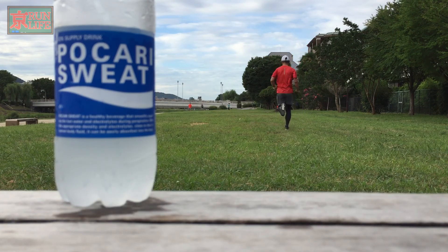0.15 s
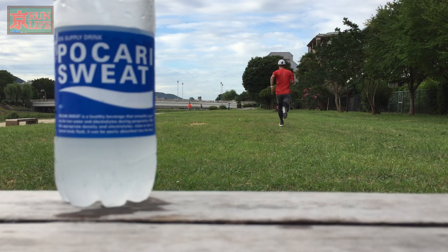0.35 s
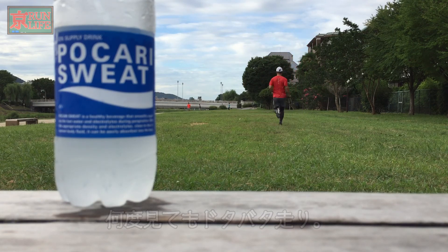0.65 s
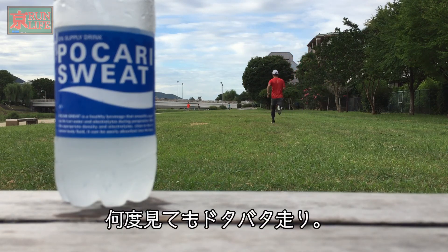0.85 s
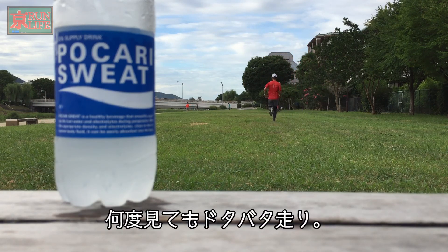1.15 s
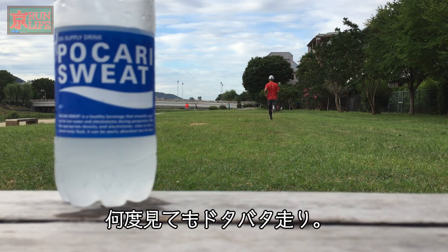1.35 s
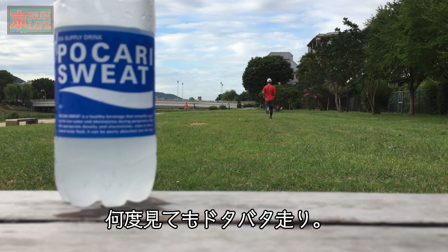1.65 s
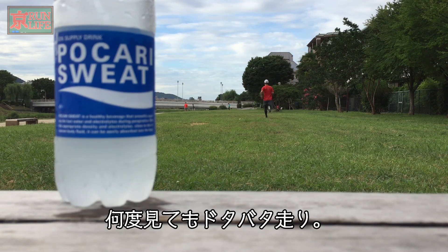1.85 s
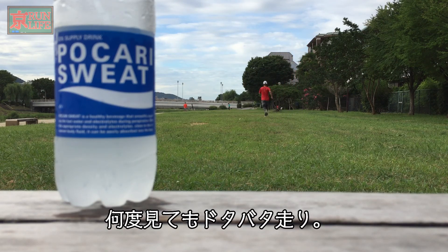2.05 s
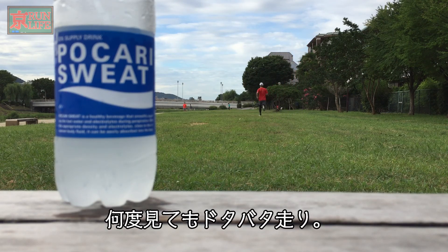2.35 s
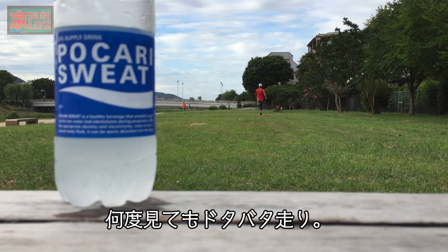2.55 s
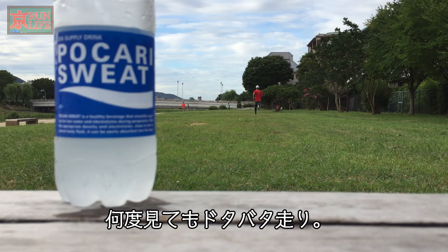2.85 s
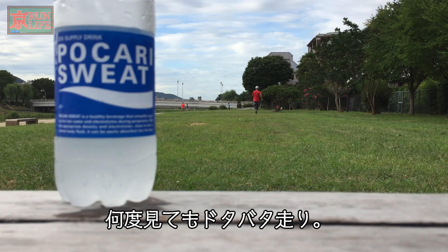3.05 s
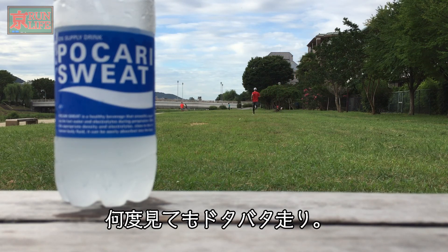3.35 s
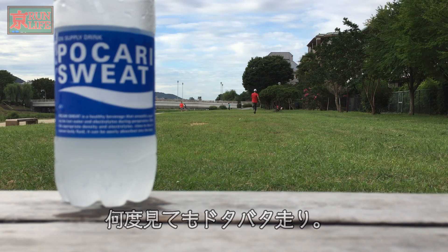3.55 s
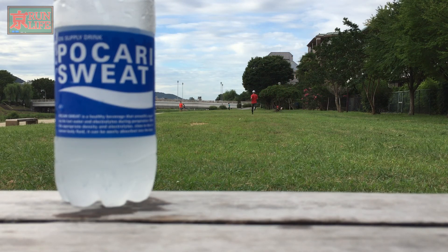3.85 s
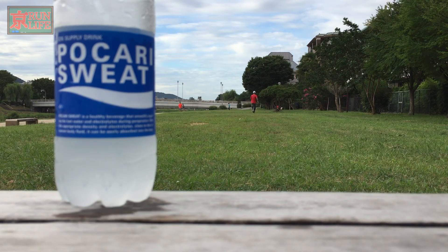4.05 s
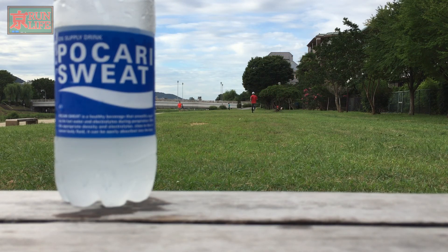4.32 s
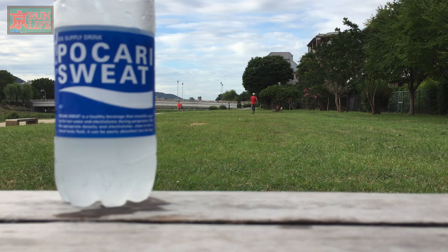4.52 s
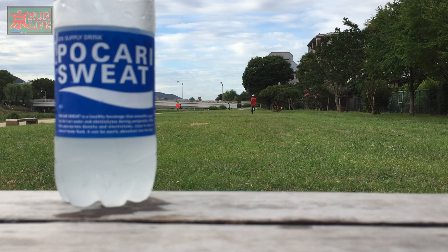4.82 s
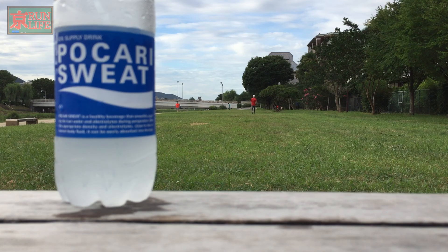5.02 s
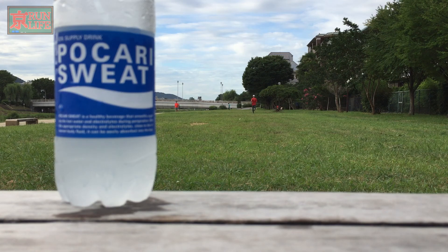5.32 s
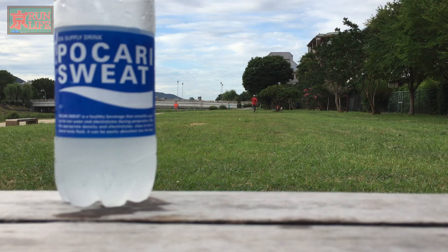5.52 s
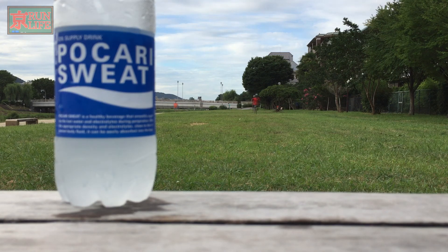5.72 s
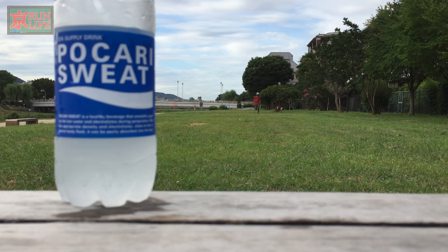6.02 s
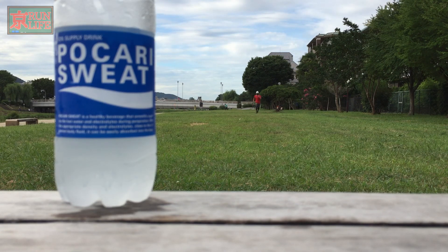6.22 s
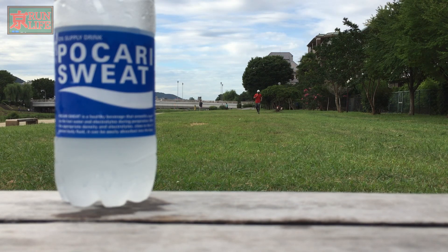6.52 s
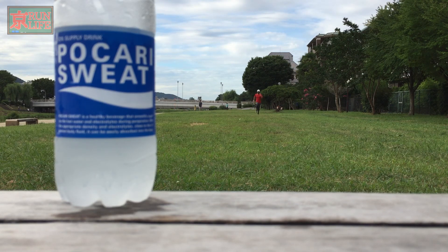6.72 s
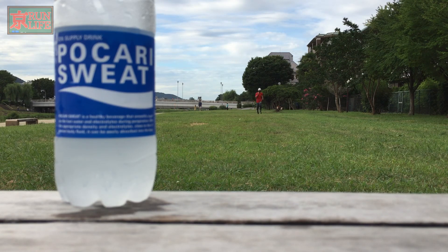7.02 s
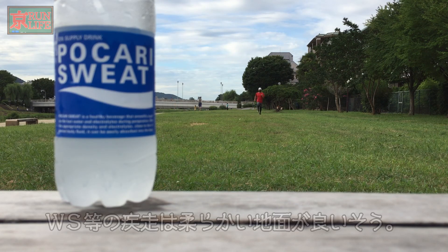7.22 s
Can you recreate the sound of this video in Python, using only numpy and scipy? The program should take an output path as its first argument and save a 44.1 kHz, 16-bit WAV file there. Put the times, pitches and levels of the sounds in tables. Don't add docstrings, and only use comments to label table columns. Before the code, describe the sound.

Many cicadas shrill without pause in park trees. Several nearer singers pulse about five times a second, drifting in and out of step, over a wide, steady far chorus. Very faint low traffic rumble lies beneath, with a distant engine hum fading early. The level dips briefly past the middle, then recovers. Mono camera microphone on a bench, open air, no obvious echo.

```python
import sys
import numpy as np
from scipy import signal
from scipy.fft import rfft, irfft
from scipy.io import wavfile

SR = 44100
rng = np.random.default_rng(int(sys.argv[2]) if len(sys.argv) > 2 else 0)


def store_wav(level_fs):
    pcm = np.round(np.clip(np.atleast_2d(level_fs), -1, 1) * 32767)
    wavfile.write(sys.argv[1], SR, pcm.T.astype(np.int16))


def boost_factor(decibels):
    exponent = np.asarray(decibels, float) / 20
    return 10 ** exponent


N = 325458
TIME = np.arange(N) / SR
HZ = np.fft.rfftfreq(N, 1 / SR)
BEAT_S = .195


def evened(x):
    return x / np.sqrt(np.mean(x ** 2) + 1e-20)


def curve(rows, axis):
    rows = np.array(rows)
    return np.interp(TIME, rows[:, 0], rows[:, axis])


def colour(points, top_hz=SR / 2):
    hz, db = np.transpose(points)
    return boost_factor(np.interp(np.log(HZ.clip(max=top_hz) + 1), np.log(hz), db, left=-90, right=-90))


def filtered(x, shape):
    return evened(irfft(rfft(x) * shape, N))


def drift(rate_hz):
    slow = TIME[::32]
    hz = np.fft.rfftfreq(len(slow), slow[1])
    lowpass = np.exp(-(hz / rate_hz) ** 2) * (hz > 0)
    shaped = rfft(rng.standard_normal(len(slow))) * lowpass
    return np.interp(TIME, slow, evened(irfft(shaped, len(slow))))


def tymbals(click_hz, weak_db, click_s, jitter, blur):
    pace = 1 + .015 * drift(3.) + jitter * drift(150.)
    count = np.floor(np.cumsum(2 * click_hz * pace) / SR)
    click_db = weak_db * (count % 2) + 1.5 * rng.standard_normal(N)
    clicks = np.diff(count, prepend=0).clip(0) * boost_factor(click_db)
    power = signal.lfilter([1], [1, -np.exp(-1 / (SR * click_s))], clicks ** 2)
    return rng.standard_normal(N) * np.sqrt(blur + (1 - blur) * power / power.mean())


def singer(phrases, body, drive, stretch, trim_db, tail_s):
    ring = sum(boost_factor(db) / (1 + (2 * (HZ - hz) / width) ** 2) ** 1.5 for hz, width, db in body)
    slow = TIME[::40]
    power = np.zeros(len(slow))
    for first, last, first_db, last_db, length in phrases:
        syllables = round((last - first) / BEAT_S) + 1
        for centre, db in np.linspace((first, first_db), (last, last_db), syllables):
            swell = np.exp(-abs(2 * (slow - centre) / (stretch * length)) ** 4)
            power += boost_factor(2 * db) * swell
    keep = np.exp(-1 / (SR * tail_s))
    power = signal.lfilter([1 - keep], [1, -keep], np.interp(TIME, slow, power))
    return boost_factor(trim_db) * np.sqrt(power) * filtered(drive, ring)



MID_PHRASES = [
    (.131, .53, -29, -28.6, .063),
    (.703, 1.084, -30.5, -32.2, .08),
    (1.258, 1.258, -27, -27, .042),
    (1.446, 2.174, -31, -31.2, .08),
    (2.378, 3.155, -29.5, -32.5, .09),
    (3.514, 4.106, -31, -33.8, .115),
    (4.629, 5.006, -33, -36, .12),
    (5.238, 5.635, -30.3, -35.8, .115),
    (6.013, 6.209, -29.5, -31, .06),
    (6.405, 6.807, -32.5, -34.5, .105),
]
MID_RESONANCES = [(4604, 280, 0.88), (5440, 2100, -2.9)]
MID_DRUMS = (167, -1.5, .0006, .03, .35)


def mid_singer():
    return singer(MID_PHRASES, MID_RESONANCES, tymbals(*MID_DRUMS), stretch=.89, trim_db=.16, tail_s=.0024)


SHRILL_PHRASES = [(.15, .364, -32, -29, .046), (.24, .436, -29.6, -28.8, .055),
                  (.598, .819, -31.5, -32, .125), (.974, 1.18, -30.5, -28.5, .045),
                  (1.044, 1.262, -31, -28, .065), (1.425, 2.406, -29.3, -32, .11),
                  (2.573, 3.338, -31, -30, .07), (2.655, 3.05, -30.5, -34.3, .06),
                  (3.512, 4.111, -30, -29.6, .125), (4.305, 4.895, -29.5, -31, .105),
                  (5.088, 5.467, -30, -28.8, .07), (5.658, 5.658, -39, -39, .11),
                  (5.843, 6.433, -32, -27, .048), (5.949, 6.332, -32, -28.3, .059),
                  (6.66, 7.033, -29.3, -28.8, .13), (7.164, 7.357, -30, -27, .04)]
SHRILL_RESONANCES = [(8500, 630, -3), (8970, 500, -1.5), (9790, 910, -6)]
SHRILL_DRUMS = (172, -2.5, .0006, .025, .4)


def shrill_singers():
    drive = tymbals(*SHRILL_DRUMS)
    return singer(SHRILL_PHRASES, SHRILL_RESONANCES, drive, stretch=1.0, trim_db=-.43, tail_s=.0013)


REED_PHRASES = [
    (.145, .974, -31.2, -33, .092),
    (1.19, 1.979, -33.5, -32.3, .1),
    (2.175, 2.374, -34, -30, .085),
    (2.57, 2.965, -31, -31.7, .107),
    (3.156, 4.128, -29.8, -31, .085),
    (4.317, 4.705, -32, -31.5, .115),
    (4.906, 5.283, -29.4, -29.7, .078),
    (5.466, 5.466, -33.9, -33.9, .077),
    (6.196, 6.41, -39, -33.1, .09),
    (6.659, 7.257, -33.5, -35.8, .108),
]
REED_RESONANCES = [(6960, 880, 0), (7320, 700, -6), (8040, 830, 1), (8920, 600, -3), (11050, 1300, -13),
                   (6240, 600, -11)]
REED_DRUMS = (152, -3.5, .0005, .015, .15)


def reed_singer():
    drive = tymbals(*REED_DRUMS)
    return singer(REED_PHRASES, REED_RESONANCES, drive, stretch=.73, trim_db=1.1, tail_s=.002)


HIGH_PHRASES = [
    (.047, .847, -35, -35, .06),
    (1.052, 2.062, -35.5, -35.5, .065),
    (2.242, 2.425, -39.2, -39.9, .1),
    (2.655, 3.279, -40, -35, .048),
    (3.505, 4.278, -39.5, -39, .09),
    (4.493, 5.277, -35.8, -34, .07),
    (5.474, 5.673, -37, -39, .062),
    (5.955, 6.328, -36, -31.5, .059),
    (6.511, 6.88, -32.5, -34.8, .064),
    (7.063, 7.255, -32, -33, .059),
]
ANSWER_PHRASES = [
    (4.36, 4.36, -42, -42, .05),
    (4.793, 4.793, -39, -39, .05),
    (5.182, 5.77, -41.6, -39.5, .048),
    (5.87, 6.24, -44.5, -41, .045),
    (7.16, 7.16, -41, -41, .045),
]
HIGH_RESONANCES = [(9360, 970, 1), (10200, 700, -2.5), (10860, 670, -0.5), (11560, 600, -10),
                   (12500, 1300, -20)]
HIGH_DRUMS = (164, -3.5, .00035, .02, .3)


def high_singers():
    phrases = HIGH_PHRASES + ANSWER_PHRASES
    return singer(phrases, HIGH_RESONANCES, tymbals(*HIGH_DRUMS), stretch=.86, trim_db=2.9, tail_s=.0017)


BELLY_PHRASES = [(.055, .879, -37, -38.5, .085), (1.101, 1.101, -41.1, -41.1, .22),
                 (1.435, 1.435, -41, -41, .117), (1.702, 2.088, -40, -41, .09),
                 (2.495, 2.645, -39, -40, .08), (2.873, 3.253, -37.3, -35, .072),
                 (3.452, 4.245, -39.5, -37.5, .08), (4.443, 4.825, -45, -35.5, .062),
                 (5.012, 5.385, -39, -43, .062), (5.856, 5.856, -43, -43, .056),
                 (6.345, 6.94, -40, -44, .083), (7.155, 7.343, -40, -47, .06)]
BELLY_RESONANCE = [(2135, 107, 0)]


def belly_note():
    breath = rng.standard_normal(N)
    return singer(BELLY_PHRASES, BELLY_RESONANCE, breath, stretch=.75, trim_db=-1.2, tail_s=.0056)


# (time [s], effort [dB], lead of the shrill voices [dB])
CHORUS_EFFORT = [(0, -.2, 3), (.4, .3, -1.5), (.9, .3, 1), (1.6, .1, -.6), (2.3, -.4, 1.2), (2.8, .2, -1),
                 (3.9, -.5, 0), (4.3, .5, -.7), (4.6, 0, -1.3), (5.1, .1, -.3), (6.3, .2, .5),
                 (6.6, 0, 1.5), (6.9, .2, -.3), (7.38, .6, 2)]
# (frequency [Hz], level [dB per Hz])
CHORUS_SPECTRUM = [(760, -107), (1300, -32.5), (1720, -21.5), (2210, -6), (2350, -2.5), (3210, -1),
                   (3670, -3.5), (4560, -2), (6560, -6.5), (8960, -1), (9630, -2), (10600, -12),
                   (13400, -21.5), (14300, -26.5), (15500, -34)]
# (centre [Hz], level [dB], share of the sag [ratio], share of the lead [ratio])
CHORUS_RANGES = [(3000, -23.3, 1.0, -.1), (5400, -22.8, 1.1, -.2), (8500, -24.4, .6, 1.0),
                 (13000, -24.7, .8, -.1)]
# (centre [Hz], width [Hz], level [dB])
CHORUS_RESONANCES = [(2290, 99, 2), (3200, 310, 1.5), (4370, 280, 2), (5720, 470, 1.), (6570, 490, -3),
                     (10450, 700, -3), (1430, 190, 3.5)]


def chorus(throb_db=.5, patchy_db=.85):
    centres = np.geomspace(1700, 14000, num=12)
    step = np.log(centres[1] / centres[0])
    rings_db = sum(db / (1 + (2 * (HZ - hz) / width) ** 2) for hz, width, db in CHORUS_RESONANCES)
    whole = colour(CHORUS_SPECTRUM, top_hz=15000) * boost_factor(rings_db)
    range_hz, *laws = np.transpose(CHORUS_RANGES)
    effort_db, lead_db, sag_db = curve(CHORUS_EFFORT, axis=1), curve(CHORUS_EFFORT, axis=2), sag()
    out = np.zeros(N)
    for hz in centres:
        distance = np.log(HZ.clip(centres[0], centres[-1]) / hz) / step
        share = np.cos(np.pi / 2 * np.clip(distance, -1, 1))
        weight = np.sqrt(np.sum((whole * share) ** 2) / np.sum(whole ** 2))
        base_db, sag_share, lead_share = (np.interp(np.log(hz), np.log(range_hz), law) for law in laws)
        level_db = base_db + effort_db + lead_share * lead_db + sag_share * sag_db
        throb = np.sin(2 * np.pi * (rng.uniform(4.9, 5.4) * TIME + rng.random() + .23 * drift(.38)))
        level_db = level_db + throb_db * throb + patchy_db * drift(14.3)
        drive = tymbals(rng.uniform(150, 175), weak_db=0., click_s=.0016, jitter=.036, blur=.68)
        out += weight * boost_factor(level_db) * filtered(drive, whole * share)
    return out


# (frequency [Hz], level [dB per Hz])
TOWN_SPECTRUM = [(13, -60), (22, -30), (39, -44.5), (65, -0.5), (206, -5), (275, -11), (388, -12),
                 (462, -18.5), (1140, -23), (1710, -28), (1960, -31.5), (2200, -12), (2860, -42),
                 (4840, -120)]


def town_rumble():
    level_db = -41.2 + .25 * TIME + .6 * sag()
    return boost_factor(level_db) * filtered(rng.standard_normal(N), colour(TOWN_SPECTRUM))


# (centre time [s], level [dB])
TRAFFIC_SWELLS = [
    (.55, -37.5),
    (1.75, -37.5),
    (2.4, -35),
    (3.0, -40),
    (3.6, -36.5),
    (4.2, -38.5),
    (5.1, -42),
    (5.7, -36.5),
    (6.3, -40),
    (7.2, -37.5),
]


def traffic_thrum():
    width_s, floor_db = .25, -46
    swells = boost_factor(floor_db)
    swells = swells + sum(boost_factor(db - 3) * np.exp(-((TIME - s) / width_s) ** 2) for s, db in TRAFFIC_SWELLS)
    return boost_factor(-5.5) * swells * filtered(rng.standard_normal(N), np.exp(-((HZ - 64) / 18) ** 2))


# (time [s], pitch [Hz], level [dB])
ENGINE_NOTE = [
    (0, 87.6, -44),
    (.3, 87.15, -41.5),
    (.7, 88, -41),
    (1.0, 88.6, -41),
    (1.4, 90.4, -40.5),
    (1.8, 90, -38),
    (2.1, 91.4, -42.5),
    (2.6, 87, -52),
]


def engine_hum():
    pitch_hz = curve(ENGINE_NOTE, axis=1) + 1.46 * drift(3.25)
    fade = np.clip((2.6 - TIME) / .26, 0, 1)
    level = boost_factor(curve(ENGINE_NOTE, axis=2) + 2.2 * drift(8.6)) * fade
    return np.sqrt(2) * level * np.sin(2 * np.pi * np.cumsum(pitch_hz) / SR)


def sag():
    start_s, fall_s, hold_s, rise_s, dip_db = 5.25, .35, .28, .33, -3.3
    return np.interp(TIME, np.cumsum([start_s, fall_s, hold_s, rise_s]), [0, dip_db, dip_db, 0])


def scene():
    near = mid_singer() + shrill_singers() + reed_singer() + high_singers() + belly_note()
    town = town_rumble() + traffic_thrum() + engine_hum()
    mono = near + chorus() + town
    return np.array([mono, mono])


def band_limit(x):
    return signal.sosfilt(signal.butter(12, 15715, fs=SR, output="sos"), x)


def record(dry):
    return band_limit(dry)


dry = scene()
out = record(dry)
store_wav(out)
```